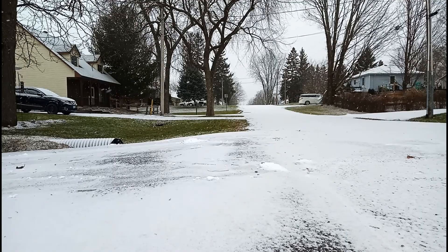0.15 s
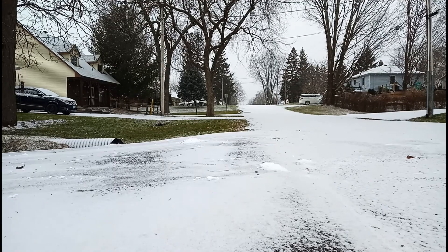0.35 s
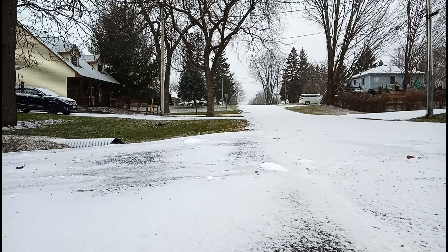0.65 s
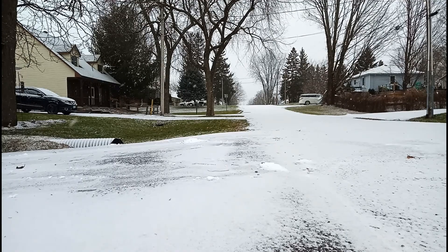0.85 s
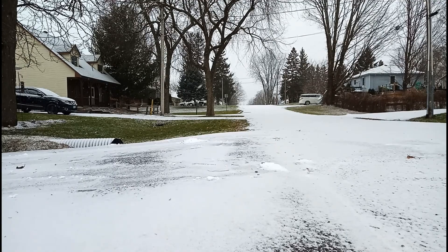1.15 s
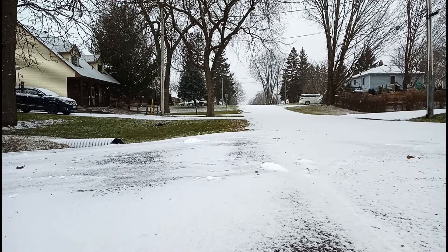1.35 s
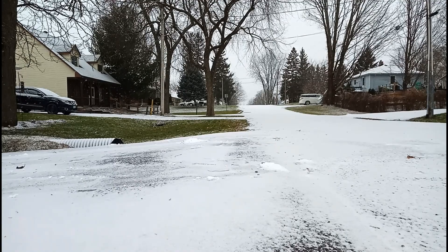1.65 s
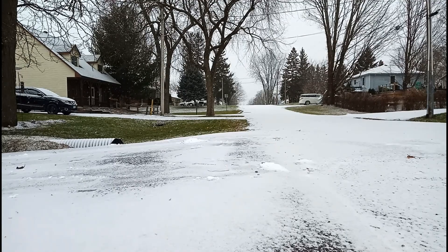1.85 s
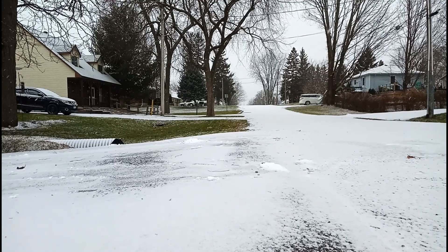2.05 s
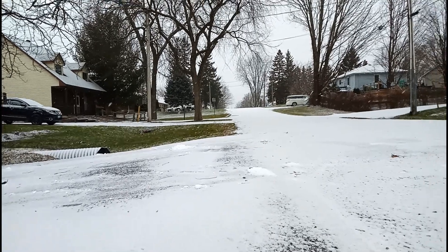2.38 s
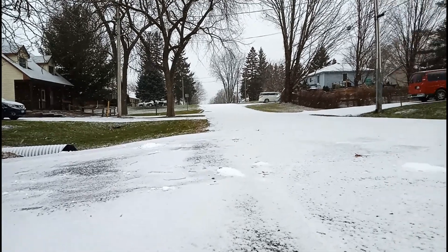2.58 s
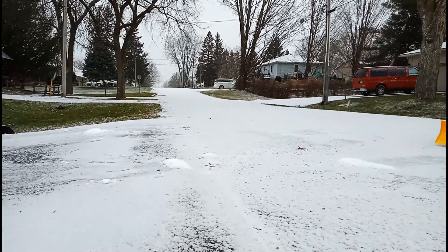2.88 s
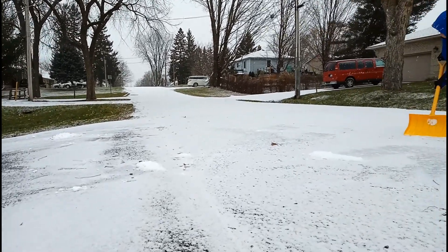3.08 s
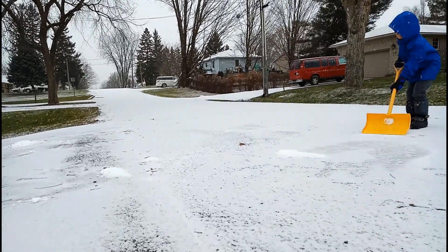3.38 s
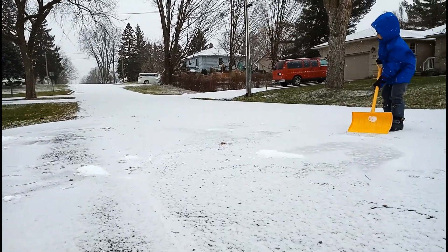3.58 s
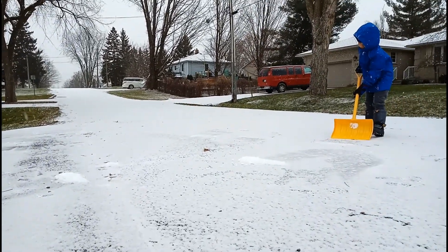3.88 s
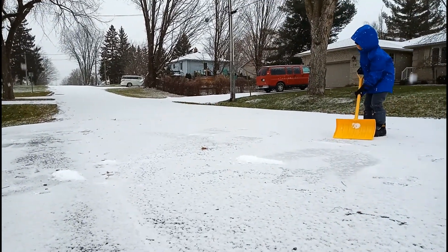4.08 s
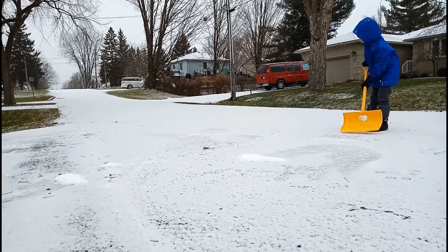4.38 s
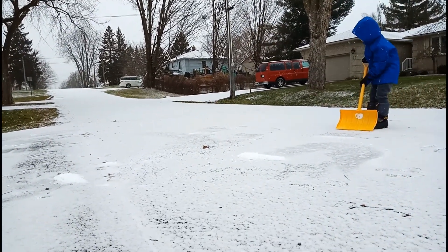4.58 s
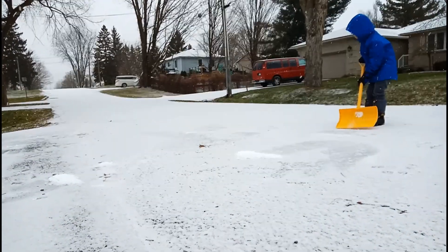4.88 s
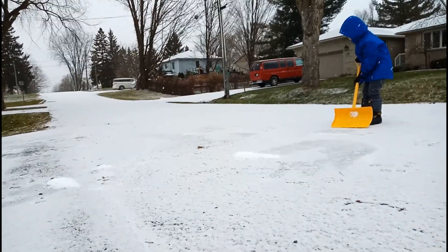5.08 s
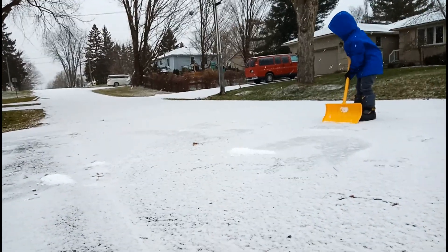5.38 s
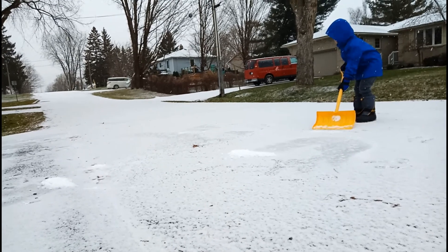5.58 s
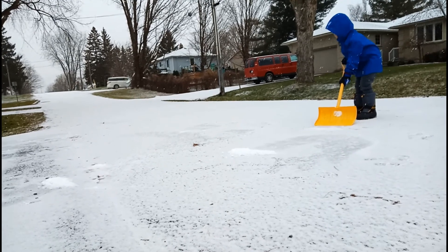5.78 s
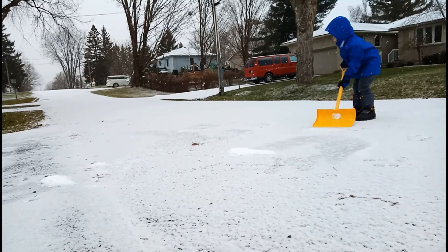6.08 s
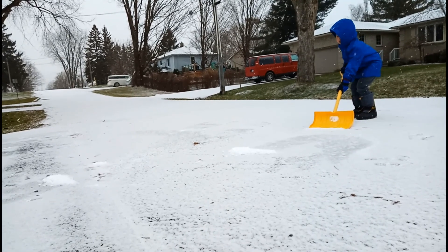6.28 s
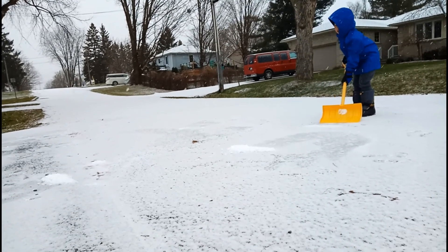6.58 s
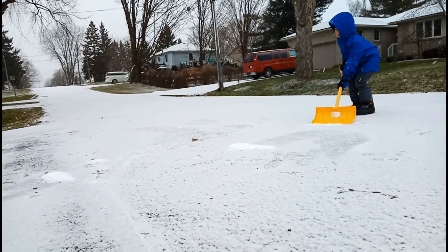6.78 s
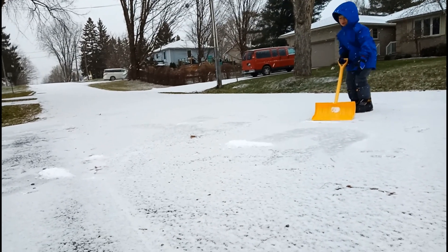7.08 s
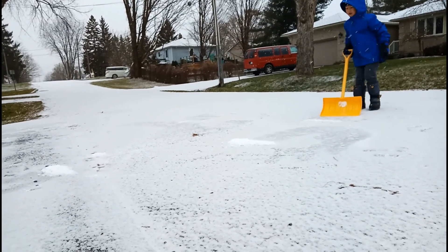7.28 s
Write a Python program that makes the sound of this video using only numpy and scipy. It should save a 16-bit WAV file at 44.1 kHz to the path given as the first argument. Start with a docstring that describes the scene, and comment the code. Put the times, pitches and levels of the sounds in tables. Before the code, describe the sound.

On a quiet snowy street with faint far traffic, a plastic shovel drops flat with a quick clatter. A jacket rustles softly while the blade trails loosely with light scratches. After a cluster of dull boot and hand thumps, the blade is pushed hard in short gritty scrapes with hollow knocks, pausing mid-way and then scraping again, loudest at one sharp crack. A small microphone hears it close and dry, with a very faint house-front echo.

```python
"""Far traffic hums throughout on a quiet street (shaped noise), over a lumpy low rumble (band noise).
A soft noise fades at the start and from 0.55 s a jacket rustles (both patchy crackle); boots and hands
thump softly (short dull sines). A child's plastic shovel drops flat at 0.2 s, trails loosely on thin
snow, then is pushed hard from 2.7 s: grit slips and knocks at its edge ring the blade modes, with a faint
echo off the house fronts. From 1.1 s small dry ticks (noise bursts) fall among them."""
import sys
import numpy as np
from scipy import signal
from scipy.io import wavfile
from scipy.ndimage import uniform_filter1d, minimum_filter1d

SR = 44100
rng = np.random.default_rng(int(sys.argv[2]) if len(sys.argv) > 2 else 0)


def store_pcm(level_fs):
    """Save levels as 16-bit WAV."""
    pcm = np.round(np.clip(level_fs, -1, 1) * 32767).astype(np.int16)
    wavfile.write(sys.argv[1], SR, np.atleast_2d(pcm).T)


N = 328059

# the edge catches on a stone or lands:
# start_s, level_db, low_db (thrum, relative), high_db (treble, relative)
KNOCK_EVENTS = [(0.238, -32, -8.5, 5.5), (0.292, -22.5, -4, -3), (0.336, -30.5, -9, -1.5),
                (0.474, -35.5, -12, -6), (0.547, -49.5, 0, -5.5), (1.424, -46.5, -16, -14),
                (1.94, -54, -3, -1), (2.021, -41, 2, -2), (2.06, -30.5, -6, -28), (2.282, -51, -17, -4),
                (2.33, -46, 2, -6), (3.011, -14, -9.5, -6), (3.083, -34, -10, -5.5), (3.164, -30, -8, -4),
                (3.172, -28.5, -7, -9), (3.192, -17.5, 9.5, -8), (3.445, -28.5, -1, -4.5),
                (3.478, -20, -13, -2), (3.556, -24.5, -19, -8), (3.634, -34.5, 8.5, -1),
                (3.678, -27.5, -2, -1), (3.896, -39.5, -15, -18), (3.983, -61, -5, -2),
                (4.066, -56, 16, -8), (4.602, -25.5, -20, -4.5), (5.2, -45.5, -19.5, -2),
                (5.23, -37, -5, -3), (5.318, -33.5, -12, -6.5), (5.359, -36, -7, -6.5), (5.402, -32, 1, -9),
                (5.422, -33, -4, -4.5), (5.491, -19, -7, -4), (5.528, -5, -18, -8.5),
                (5.565, -25.5, -15, 3), (5.773, -39, -11, -1), (5.783, -35, -18, 0), (5.868, -20.5, 2, -5),
                (5.967, -34, -9, -13), (6.061, -36.5, 11, -7), (6.143, -18, -22, -2.5), (6.69, -47, -3, -6),
                (6.758, -29, 10.5, -10), (7.083, -35, -3, -2.5), (7.091, -45, -6, -1), (7.185, -26, -3, -7),
                (7.263, -25.5, -9, -3.5)]


def gain_of(db):
    """Decibels to an amplitude factor."""
    return 10 ** (np.asarray(db) / 20)


def evened(x):
    """Scales to rms 1."""
    return x / np.sqrt(np.mean(x ** 2) + 1e-20)


def read(points, hz):
    """Reads a table of (Hz, value) along a log-frequency axis."""
    point_hz, value = np.transpose(points)
    return np.interp(np.log(hz + 1), np.log(point_hz + 1), value)


def add(mix, start_s, sound):
    """Mixes a sound in at start_s, cut at the end of the mix."""
    part = mix[round(start_s * SR):][:len(sound)]
    part += sound[:len(part)]


def causal(gain):
    """Minimum-phase impulse response of energy 1, shaped by the gain per frequency."""
    both_sides = np.r_[gain, gain[-2:0:-1]]
    log_gain = np.log(np.maximum(both_sides, 1e-5))
    spectrum = np.exp(np.conj(signal.hilbert(log_gain)))
    taps = np.fft.ifft(spectrum).real[:len(gain)]
    return taps / np.linalg.norm(taps)


def slips(per_s, spread_db, smooth, bumps_db, bump_s):
    """Random clicks of uneven size over a smooth rub, swelling with the bumps of the surface."""
    size_draw, time_draw, sign_draw, bump_draw = rng.random((4, N))
    size = gain_of(spread_db * np.minimum(-np.log(size_draw + 1e-9), 4))
    clicks = evened(size * (time_draw < per_s / SR) * np.sign(sign_draw - 0.5))
    rub = clicks + smooth * rng.standard_normal(N)
    width = max(round(bump_s * SR), 1)
    bumps = evened(uniform_filter1d(uniform_filter1d(bump_draw - 0.5, width), width))
    return evened(rub * gain_of(bumps_db * bumps))


def patchy(x, patch_db):
    """The point of contact wanders, so each moment favours other frequencies (patch_db is rms)."""
    z = signal.stft(x, nperseg=512, noverlap=384)[2]
    field = rng.standard_normal(z.shape[::-1]).T
    field = uniform_filter1d(field, size=2, axis=0)
    field = evened(uniform_filter1d(field, size=16, axis=1))
    varied = signal.istft(z * gain_of(patch_db * field), nperseg=512, noverlap=384)[1]
    return evened(varied[:N])


def street():
    """Far traffic and air: random spectra with drifting patches."""
    # hz, density_db (dB per Hz, shape only)
    street_shape = [(15, -34), (25, -7), (38, -7.5), (69, -12), (96, 4), (188, -10), (378, -10),
                    (598, -12.5), (3260, -21.5), (6730, -38.5), (13900, -36), (15500, -46)]
    level_db, patch_db = -62, 1.5
    frames, hz = N // 256 + 5, np.fft.rfftfreq(1024, 1 / SR)
    real, imag, patches = rng.standard_normal((frames, 513, 3)).T
    patches = uniform_filter1d(patches, size=6, axis=0)
    patches = evened(uniform_filter1d(patches, size=20, axis=1))
    z = (real + 1j * imag) * gain_of(read(street_shape, hz)[:, None] + patch_db * patches)
    hum = signal.istft(z, nperseg=1024, noverlap=768)[1][:N]
    return gain_of(level_db) * evened(hum)


def arch(rise_s, hold_s, fall_s):
    """Level in dB under the peak: a rounded rise, a hold, a rounded fall."""
    rise_db, fall_db = -31.5, -37  # reached rise_s before and fall_s after the hold
    t = np.arange(0, rise_s + hold_s + 1.5 * fall_s, 1 / SR)
    before = np.maximum(1 - t / rise_s, 0)
    after = np.maximum((t - rise_s - hold_s) / fall_s, 0)
    return rise_db * before ** 2 + fall_db * after ** 2


def soft_noise_tracks():
    """Gain tracks of the dull and the crisp part of the soft noises, one arch each."""
    # first row: soft opening noise; later rows: the jacket rubs
    # start_s, rise_s, hold_s, fall_s, dull_db, crisp_db (relative to dull)
    soft_events = [(0.0, 0.0054, 0.054, 0.61, -62, -1.5), (0.55, 0.14, 0.022, 0.35, -63, -3),
                   (0.976, .12, 0.082, 0.14, -60.5, 5), (1.2, .1, 0.026, 0.18, -64, 2),
                   (1.345, 0.09, 0.11, 0.41, -59, -2), (2.674, 0.055, .03, 0.11, -70.5, 4),
                   (4.1, 0.077, .1, 0.15, -82, 5), (4.435, 0.021, .005, 0.048, -72.5, -9.5)]
    tracks = np.zeros((2, N))
    for start_s, rise_s, hold_s, fall_s, dull_db, crisp_db in soft_events:
        shape_db = arch(rise_s, hold_s, fall_s)
        add(tracks[0], start_s, gain_of(dull_db + shape_db))
        add(tracks[1], start_s, gain_of(dull_db + crisp_db + shape_db))
    return tracks


def opening_noise_and_jacket():
    """A soft opening noise, then stiff fabric rubs: patchy crackle in a dull and a crisp band."""
    # hz, level_db (shape only)
    soft_shape = [(300, -18.5), (700, -1), (1400, 3), (2800, 0), (3700, -0.5), (4700, -11), (5700, -19),
                  (7400, -33), (15500, -40.5)]
    crisp_hz = 2500
    crackle = slips(per_s=2300.0, spread_db=3.5, smooth=1.0, bumps_db=1.4, bump_s=0.011)
    crackle = patchy(crackle, patch_db=0.8)
    hz = np.fft.rfftfreq(2048, 1 / SR)
    crisp = 1 / (1 + (crisp_hz / (hz + 1)) ** 6)
    shape, out = gain_of(read(soft_shape, hz)), np.zeros(N)
    for drive, share in zip(soft_noise_tracks(), (1 - crisp, crisp)):
        out += signal.oaconvolve(crackle * drive, causal(shape * np.sqrt(share)))[:N]
    return out


def pressure():
    """Strokes and knocks press the edge down: gain tracks for the middle, low and high parts."""
    # edge on the ground: start_s, rise_s, hold_s, fall_s, level_db, low_db (thrum, relative),
    # high_db (treble, relative)
    stroke_events = [(0.236, 0.0062, 0.017, 0.046, -28, -8, -4),
                     (0.284, 0.016, 0.0067, 0.028, -20.5, 6, -4.5),
                     (0.325, 0.012, 0.0071, 0.089, -32.5, 1, -8.5),
                     (0.467, 0.013, 0.0055, 0.037, -35, 3.5, -3.5),
                     (1.813, 0.13, .02, 0.19, -50, -3.5, 1.5), (1.996, 0.092, 0.12, 0.1, -28.5, -7.5, -2.5),
                     (2.01, 0.0095, 0.036, .06, -49.5, 11, -14),
                     (2.263, 0.023, 0.012, 0.072, -30.5, -10, -2.5),
                     (2.356, 0.022, 0.0041, 0.046, -42, -11, -4), (2.882, 0.021, 0.051, 0.077, -59, 3, -2),
                     (3.0, 0.0062, 0.011, 0.076, -20.5, 0, -6.5), (3.067, 0.041, 0.094, 0.045, -50, 13, -9),
                     (3.137, .13, 0.026, 0.073, -14, -5.5, -3.5),
                     (3.335, 0.032, 0.051, .04, -43.5, -3.5, -17), (3.437, 0.03, 0.087, 0.16, -21, -3, -3),
                     (3.7, .05, 0.11, .06, -57.5, -8, -4.5), (3.863, 0.039, .005, 0.051, -43.5, 1, -5.5),
                     (3.96, 0.024, 0.013, .05, -55, 4, -4), (4.049, 0.024, 0.0069, 0.049, -50, -5, -8.5),
                     (4.6, 0.006, 0.0085, 0.056, -39.5, 3, -31), (5.197, 0.045, 0.019, 0.11, -33.5, -1, -4),
                     (5.365, 0.14, 0.094, 0.061, -16, -4, -4), (5.605, 0.028, 0.021, 0.15, -36, -8.5, 0.5),
                     (5.751, 0.046, 0.13, 0.034, -27, -4, -6),
                     (5.945, 0.026, 0.0041, 0.035, -25.5, -1.5, -5.5),
                     (6.025, 0.14, 0.055, 0.094, -18, -7.5, -4), (6.309, 0.17, 0.06, 0.11, -26, -4, -5),
                     (6.668, 0.12, 0.046, 0.08, -24, -6, -4.5), (6.875, 0.036, 0.046, 0.22, -58, -17, -1.5),
                     (7.076, 0.028, 0.0056, 0.054, -28.5, -1.5, -6.5),
                     (7.156, 0.034, 0.064, 0.47, -29, -2, -5)]
    # dB of thrum and of treble per dB of pressure
    thrum_law, grit_rise_law, grit_fall_law = 0.89, 1.16, 1.46
    trickle_db, trickle_t60_s = -23.5, 0.17  # loose snow slides on after the blade stops
    skid_t60_s, thrum_t60_s, treble_t60_s = 0.066, 0.047, 0.089
    knock_rise_s, thrum_lag_s = 0.00059, 0.0045
    tracks, t = np.zeros((3, N)), np.arange(SR // 2) / SR

    for start_s, rise_s, hold_s, fall_s, level_db, low_db, high_db in stroke_events:
        shape_db = arch(rise_s, hold_s, fall_s)
        rising = np.arange(len(shape_db)) < rise_s * SR
        grit_law = np.where(rising, grit_rise_law, grit_fall_law)
        trickle = gain_of(trickle_db - 60 * t / trickle_t60_s) * np.minimum(t / fall_s, 1)
        for track, extra_db, law in zip(tracks, (0, low_db, high_db), (1, thrum_law, grit_law)):
            add(track, start_s, gain_of(level_db + extra_db + law * shape_db))
            add(track, start_s + rise_s + hold_s, gain_of(level_db + extra_db) * trickle)
    tracks = uniform_filter1d(tracks, size=88, axis=1)  # 2 ms

    t60s = skid_t60_s, thrum_t60_s, treble_t60_s
    for start_s, level_db, low_db, high_db in KNOCK_EVENTS:
        for track, extra_db, t60_s in zip(tracks, (0, low_db, high_db), t60s):
            decay = gain_of(level_db + extra_db - 60 * t / t60_s)
            add(track, start_s, decay * np.minimum(t / knock_rise_s, 1))

    step = 1 / (thrum_lag_s * SR)  # one-pole lag: the thrum builds up later
    tracks[1] = signal.lfilter([step], [1, step - 1], tracks[1])
    return tracks


def rumble():
    """Lumpy low noise that follows the blade's low thrum and swells now and then."""
    # centre_s, level_db
    swell_events = [(0.301, -44), (1.69, -63), (2.3, -50), (2.66, -58), (3.621, -50.5), (4.25, -62),
                    (4.52, -58), (6.0, -52), (6.25, -52), (6.42, -52), (6.55, -48)]
    low_hz, high_hz, swell_s = 70, 124, 0.059
    floor_db, push_db, push_law = -67, -41.5, 0.7  # push_law: dB of rumble per dB of thrum
    band = signal.butter(2, (low_hz, high_hz), "band", fs=SR, output="sos")
    low = signal.sosfilt(band, rng.standard_normal(N))
    t = np.arange(N) / SR
    thrum = abs(uniform_filter1d(pressure()[1], size=2000))  # 45 ms
    push = gain_of(push_db) * thrum ** push_law
    swells = sum(gain_of(db) * np.exp(-((t - s) / swell_s) ** 2) for s, db in swell_events)
    return evened(low) * (gain_of(floor_db) + push + swells)


def thumps():
    """Boots and hands: each thump is a short dull ring that swells over its first cycle."""
    # start_s, level_db, pitch_hz
    thump_events = [(0.011, -39, 403), (0.175, -36, 238), (0.209, -30, 248), (1.427, -39, 265),
                    (1.687, -37, 133), (2.608, -27.5, 333), (2.615, -22.5, 477), (2.627, -23, 185),
                    (2.632, -26, 387), (2.699, -23, 208), (2.804, -37.5, 229), (2.906, -27.5, 196),
                    (2.941, -30, 238), (2.958, -33, 294), (3.732, -32.5, 173), (3.882, -24.5, 203),
                    (4.466, -44, 225), (4.495, -36.5, 120), (4.581, -36, 120.5), (5.081, -39.5, 204)]
    t60_cycles = 7.5
    out, t = np.zeros(N), np.arange(SR // 8) / SR
    for start_s, level_db, pitch_hz in thump_events:
        swell = 1 - np.exp(-t * pitch_hz * 2.5)
        decay = gain_of(level_db - 60 * t * pitch_hz / t60_cycles)
        add(out, start_s, decay * swell * np.sin(2 * np.pi * pitch_hz * t))
    return out


def shovel():
    """Slips and knocks at the edge drive the low, middle, high and top parts of one blade."""
    # modes: pitch_hz, width_hz, then dB over the broad edge sound: flat_db, trailing_db, pushed_db
    blade_modes = [(305, 30, -9.5, 5, 6.5), (397, 27, 11, 17.5, 9), (458, 62, 9.5, -10, 11.5),
                   (523, 32, 18.5, 25.5, 13.5), (712, 10, 14, 13, -11.5), (785, 25, 10, 23, 3.5),
                   (886, 33, 15, 13.5, 12.5), (995, 38, 18.5, 16, 17), (1249, 22, 9.5, 20.5, 0),
                   (1624, 180, 3, 13.5, 5), (2027, 40, -4, 14.5, 3), (2125, 38, -1.5, -15, 5),
                   (2270, 170, 6.5, 8, -6.5), (2600, 13, -5.5, 6, 2.5), (3176, 40, 3.5, 9.5, 5),
                   (3416, 90, 7.5, 11.5, 7), (3450, 10, 3.5, -23, 5.5), (3750, 50, 4, 11, 7.5),
                   (3950, 140, 4, -16, 9.5), (6080, 360, 9, 12, 13), (7060, 160, 9, 9, 6.5)]
    # broad sound of the edge: hz, level_db (shape only)
    edge_shape = [(60, -44.5), (110, -16), (150, -9), (300, -8), (600, -9.5), (1400, -8.5), (2300, -2),
                  (2750, -3.5), (4200, -19), (4750, -28), (5400, -35), (5750, -46), (6800, -47.5),
                  (8000, -51), (10000, -56.5), (15500, -55)]
    low_hz, high_hz, top_hz = 700, 2600, 5500
    grip_changes_s = 0.46, 2.7  # dropped flat, then trailing, then pushed
    crack_db = 15.5  # first slip of a knock, over the rms of the grit

    hz = np.fft.rfftfreq(16384, 1 / SR)
    low = 1 / (1 + (hz / low_hz) ** 8)
    high = 1 / (1 + (high_hz / (hz + 1)) ** 8)
    top = 1 / (1 + (top_hz / (hz + 1)) ** 12)

    grit = slips(per_s=3500.0, spread_db=1.5, smooth=0.72, bumps_db=1.54, bump_s=0.006)
    grit = patchy(grit, patch_db=3.0)
    # single sharp stones
    stones = slips(per_s=500.0, spread_db=4.5, smooth=0.5, bumps_db=0.0, bump_s=0.0036)
    # the loose blade skips
    chatter = slips(per_s=1800.0, spread_db=5.5, smooth=0.52, bumps_db=1.0, bump_s=0.0067)
    chatter = patchy(chatter, patch_db=3.0)

    middle_drive, low_drive, high_drive = pressure()
    top_drive = gain_of(-18.5) * abs(high_drive) ** 1.287  # harder contact gives sharper slips
    stone_level = np.sqrt(abs(uniform_filter1d(stones ** 2, size=200)))
    top_drive = top_drive * (0.5 + 1.1 * stone_level)  # stones flash in the top
    parts = (
        (low_drive, low),
        (middle_drive, (1 - low) * (1 - high)),
        (high_drive, high - top),
        (top_drive, top),
    )

    grips = np.digitize(np.arange(N) / SR, grip_changes_s)
    contact = np.where(grips == 1, chatter, grit + 0.23 * stones)
    cracks = [round((knock[0] + 0.001) * SR) for knock in KNOCK_EVENTS]
    contact[cracks] = gain_of(crack_db)

    out = np.zeros(N)
    for grip in range(3):
        rings = np.zeros(len(hz))  # power over the broad edge sound
        for mode in blade_modes:
            detune = 2 * (hz - mode[0]) / mode[1]
            rings += gain_of(mode[2 + grip]) ** 2 / (1 + detune ** 2)
        blade = gain_of(read(edge_shape, hz)) * np.sqrt(1 + rings)
        for drive, share in parts:
            taps = causal(blade * np.sqrt(abs(share)))
            out += signal.oaconvolve(contact * drive * (grips == grip), taps)[:N]
    return out


def yard(x):
    """House-front echoes: sparse, random sign, from 15 ms on, each band dying at its own speed."""
    # hz, t60_s
    yard_decay = [(150, 0.34), (1000, 0.25), (4000, 0.65), (10000, 0.054)]
    taps = np.zeros(SR // 2)
    slots = np.arange(660, SR // 2 - 20, 20)
    taps[slots + rng.integers(0, 20, len(slots))] = rng.choice([-1., 1.], len(slots))
    hz, t, z = signal.stft(taps, SR, nperseg=256)
    decay = gain_of(-60 * t / read(yard_decay, hz)[:, None])
    tail = signal.istft(z * decay, SR, nperseg=256)[1]
    return signal.oaconvolve(x, tail / np.linalg.norm(tail))[:N]


def ticks():
    """Each tick is a very short dry burst of noise around its pitch."""
    # start_s, level_db, pitch_hz
    tick_events = [(1.145, -51, 4000), (1.305, -53, 2200), (1.74, -62, 4740), (2.641, -44, 3800),
                   (4.42, -60, 4200)]
    t60_s, half_width = 0.031, 0.19  # half_width: share of the pitch
    out, t = np.zeros(N), np.arange(SR // 20) / SR
    for start_s, level_db, pitch_hz in tick_events:
        edges_hz = pitch_hz * (1 - half_width), pitch_hz * (1 + half_width)
        band = signal.butter(4, edges_hz, "band", fs=SR, output="sos")
        burst = evened(signal.sosfilt(band, rng.standard_normal(len(t))))
        add(out, start_s, gain_of(level_db - 60 * t / t60_s) * burst)
    return out


def scene():
    """Street, opening noise and jacket, rumble, thumps, shovel with its echo, and ticks."""
    echo_db = -27.5
    soft = opening_noise_and_jacket()
    blade = shovel()
    echo = gain_of(echo_db) * yard(blade)
    return (street() + soft + rumble() + thumps() + blade + echo + ticks())[None]


def record(dry):
    """A small microphone loses deep bass, a quick limiter holds the peaks; then the band limit."""
    bass_cut_hz, ceiling, band_limit_hz = 64.4, 0.86, 15700
    thin = signal.sosfilt(signal.butter(2, bass_cut_hz, "high", fs=SR, output="sos"), dry)
    allowed = np.minimum(ceiling / (abs(thin) + 1e-9), 1)
    allowed = minimum_filter1d(allowed, size=441)  # 10 ms
    held = thin * uniform_filter1d(allowed, size=441)
    taps = signal.firwin(511, band_limit_hz, window=("kaiser", 9), fs=SR)
    return signal.oaconvolve(held, taps[None], "same")


dry = scene()
out = record(dry)
store_pcm(out)
```